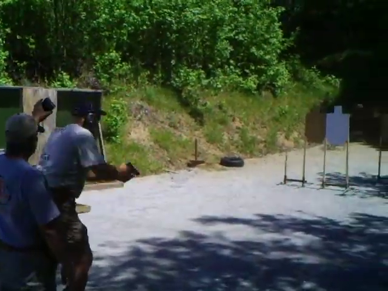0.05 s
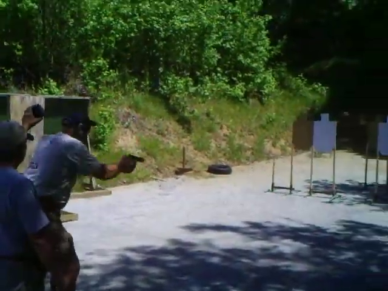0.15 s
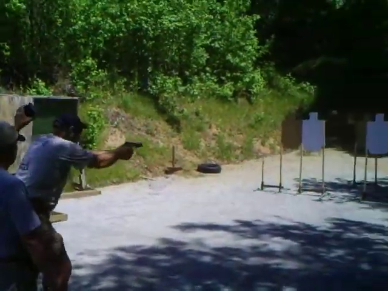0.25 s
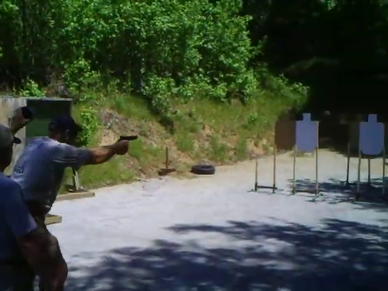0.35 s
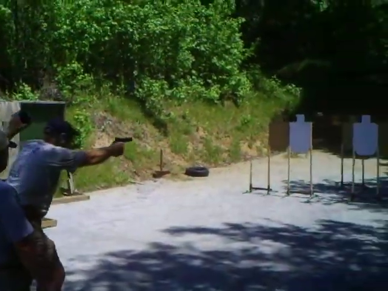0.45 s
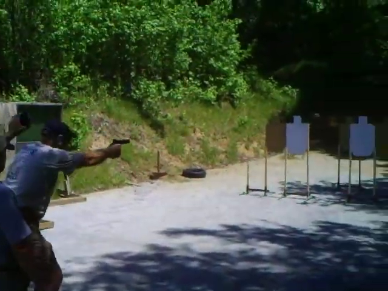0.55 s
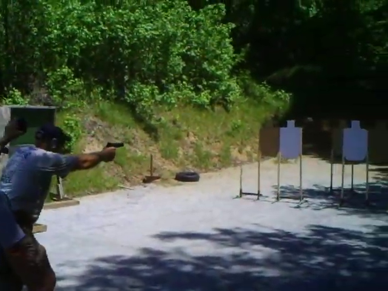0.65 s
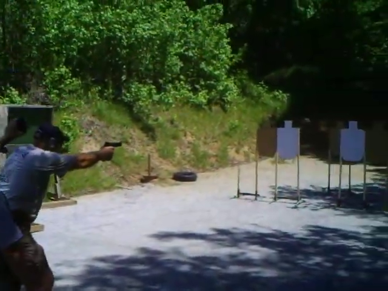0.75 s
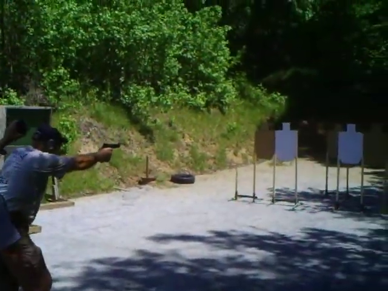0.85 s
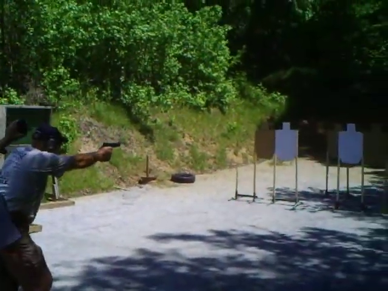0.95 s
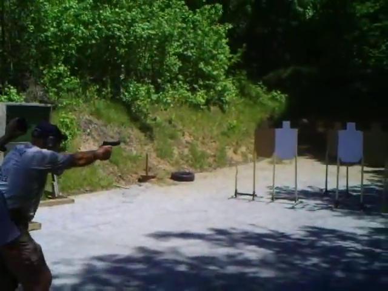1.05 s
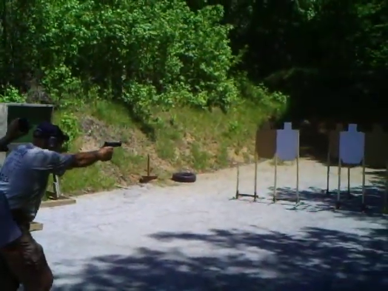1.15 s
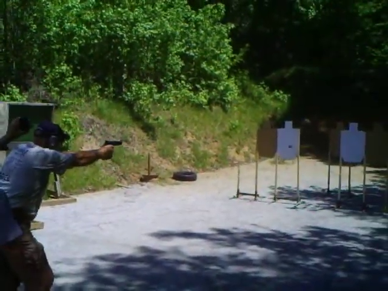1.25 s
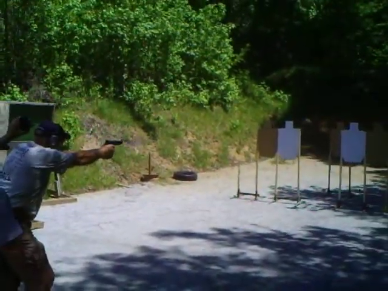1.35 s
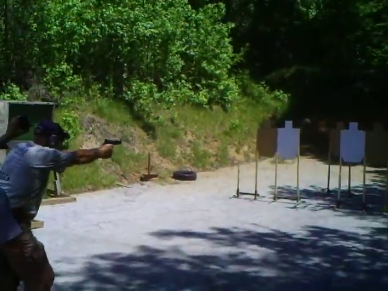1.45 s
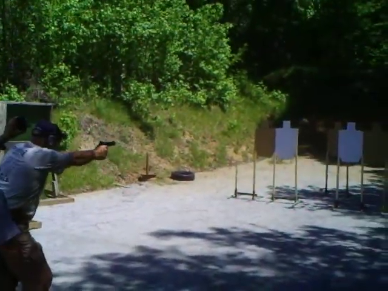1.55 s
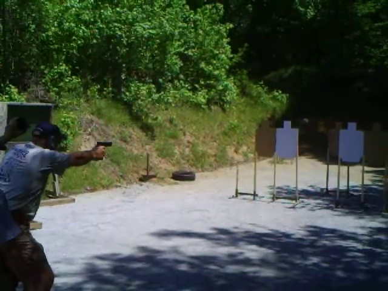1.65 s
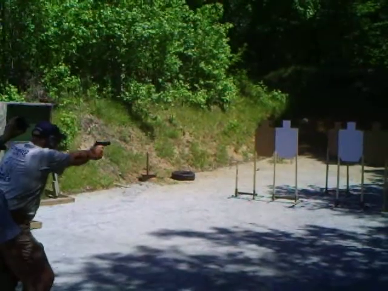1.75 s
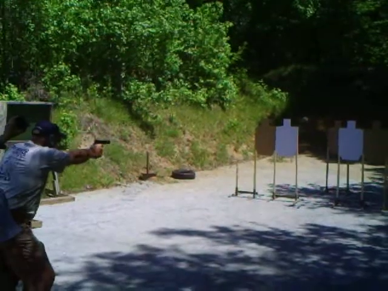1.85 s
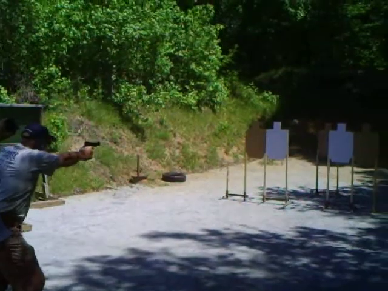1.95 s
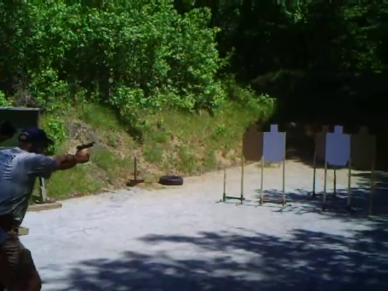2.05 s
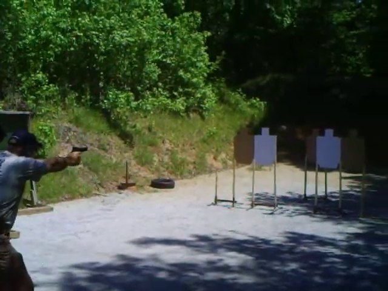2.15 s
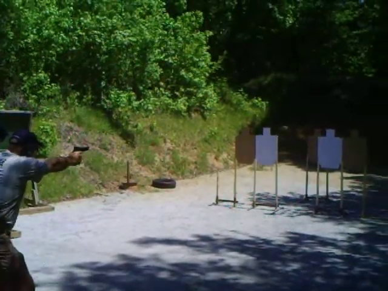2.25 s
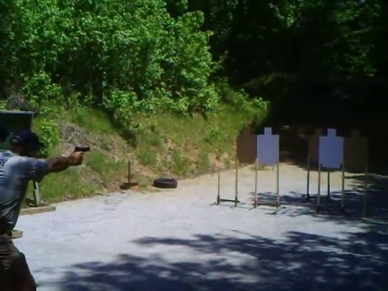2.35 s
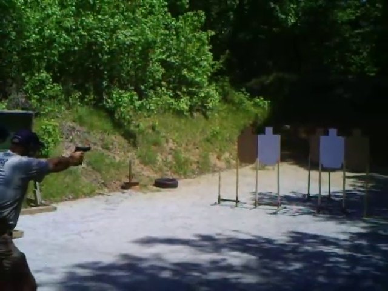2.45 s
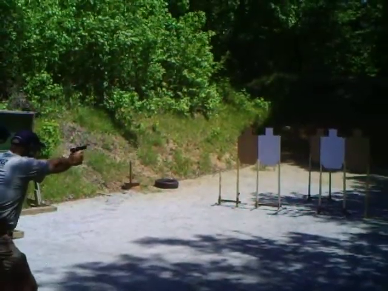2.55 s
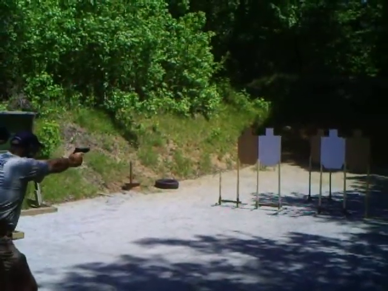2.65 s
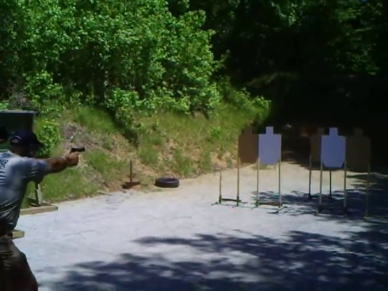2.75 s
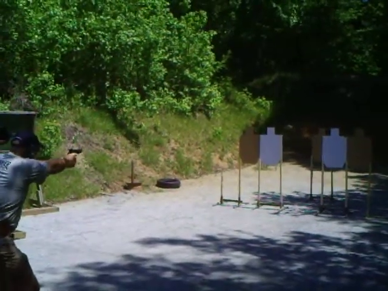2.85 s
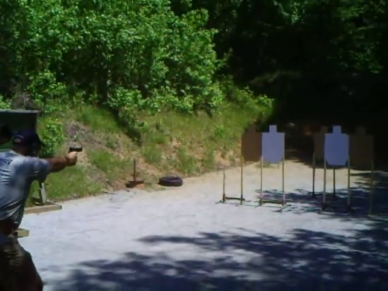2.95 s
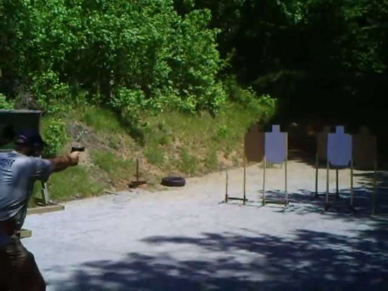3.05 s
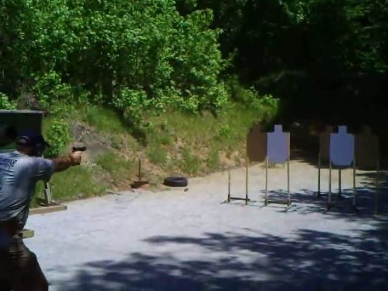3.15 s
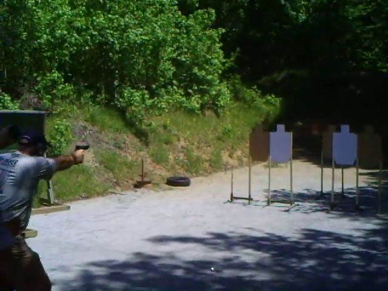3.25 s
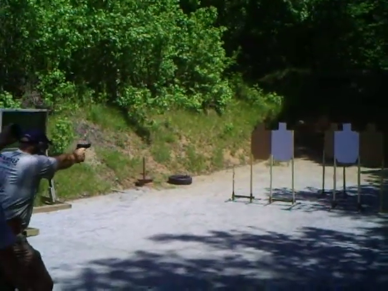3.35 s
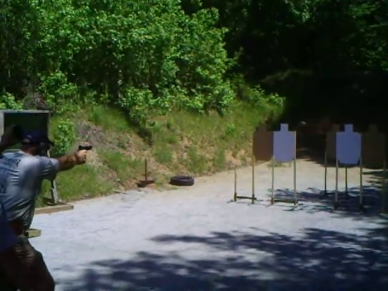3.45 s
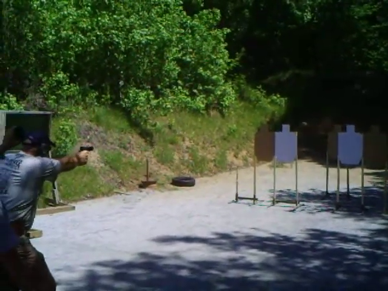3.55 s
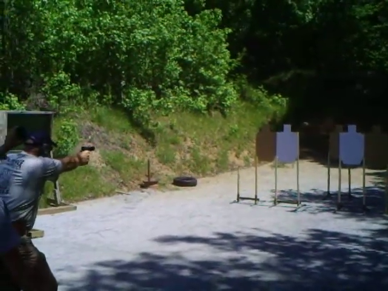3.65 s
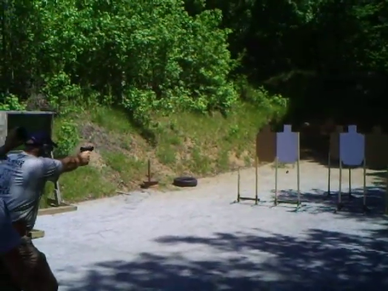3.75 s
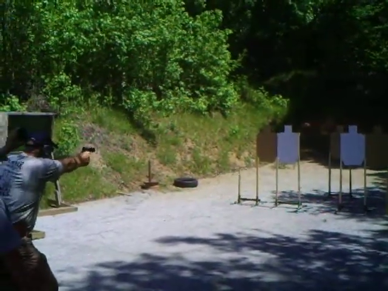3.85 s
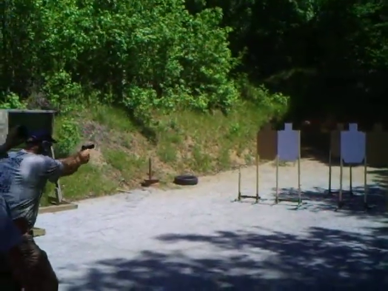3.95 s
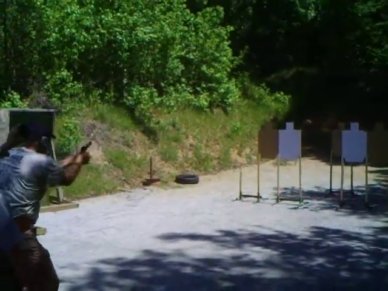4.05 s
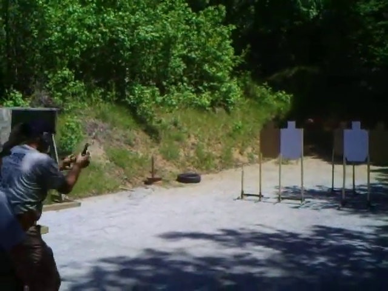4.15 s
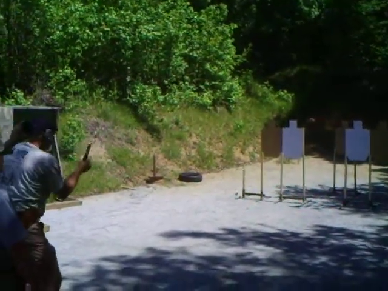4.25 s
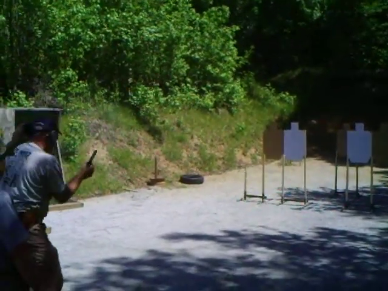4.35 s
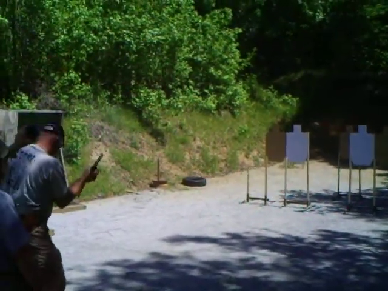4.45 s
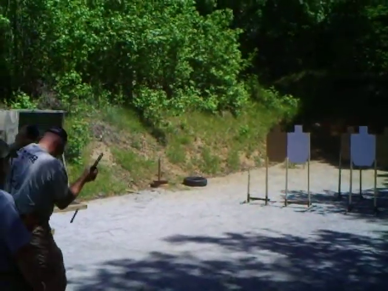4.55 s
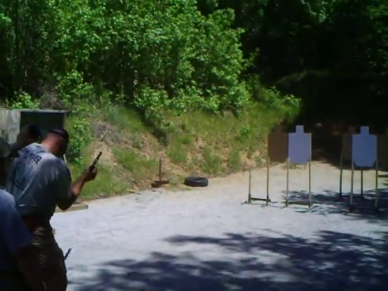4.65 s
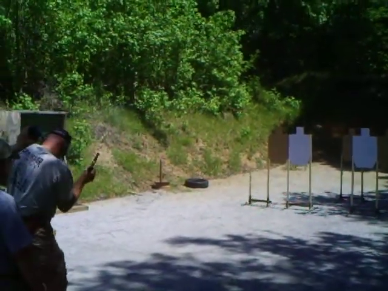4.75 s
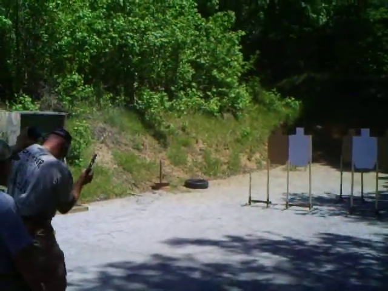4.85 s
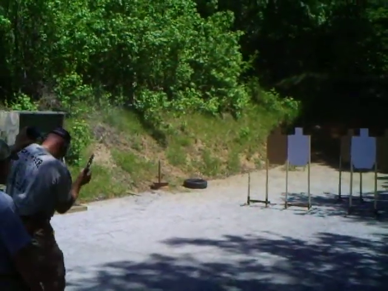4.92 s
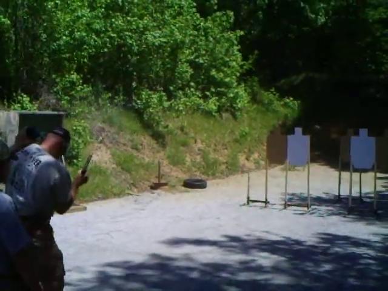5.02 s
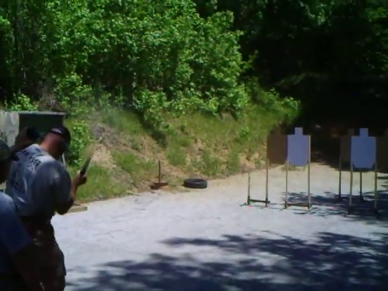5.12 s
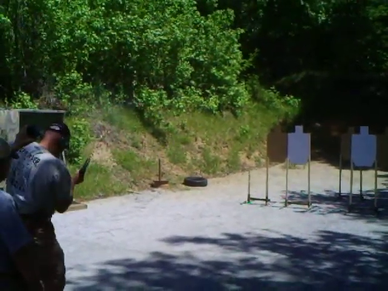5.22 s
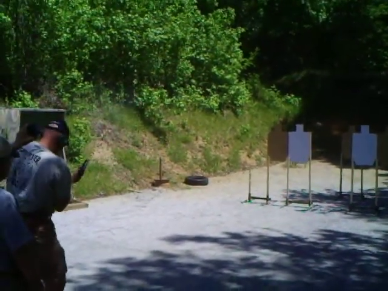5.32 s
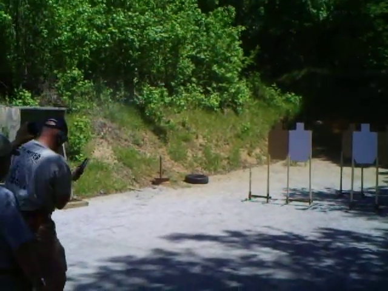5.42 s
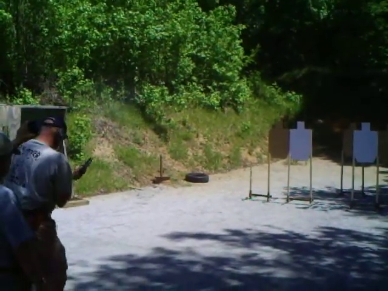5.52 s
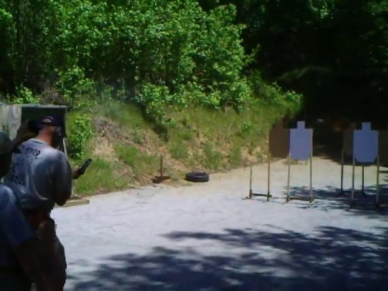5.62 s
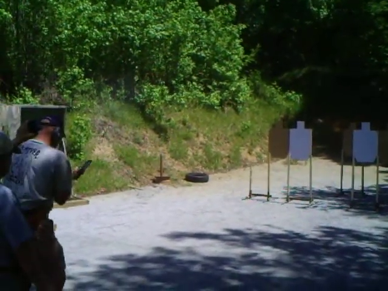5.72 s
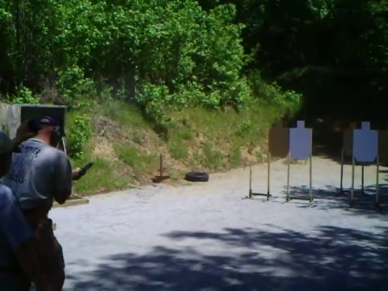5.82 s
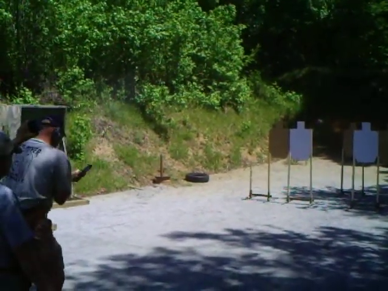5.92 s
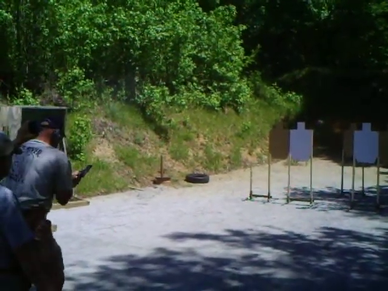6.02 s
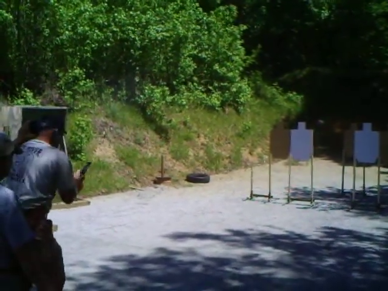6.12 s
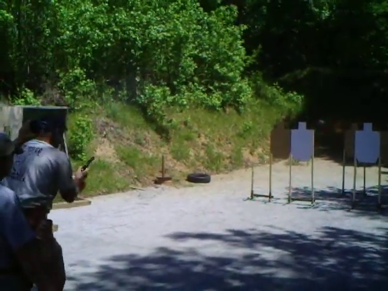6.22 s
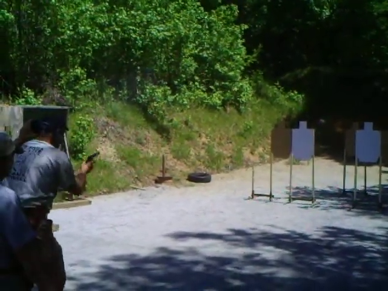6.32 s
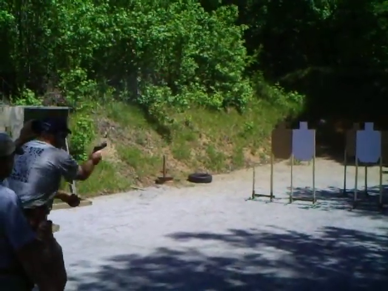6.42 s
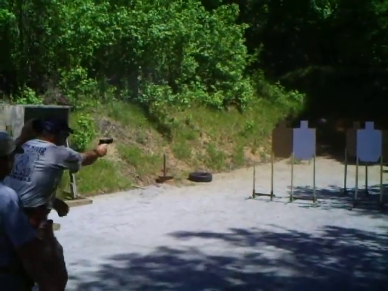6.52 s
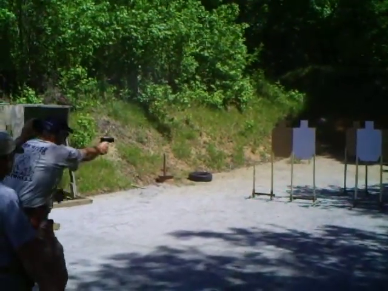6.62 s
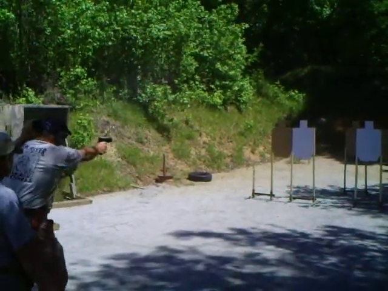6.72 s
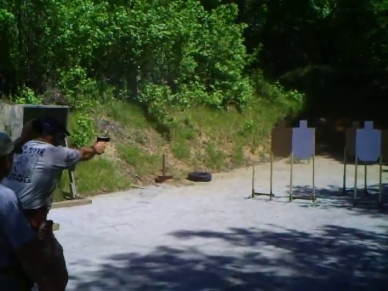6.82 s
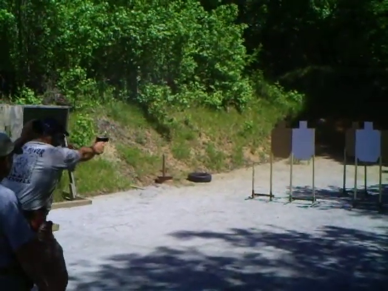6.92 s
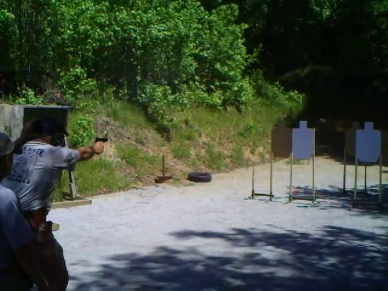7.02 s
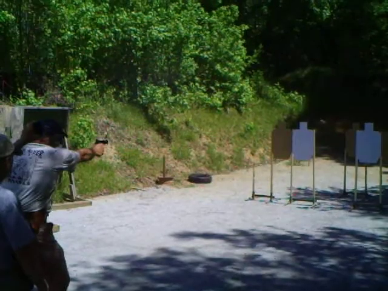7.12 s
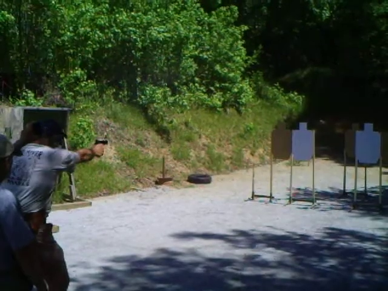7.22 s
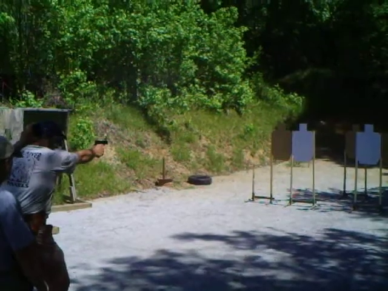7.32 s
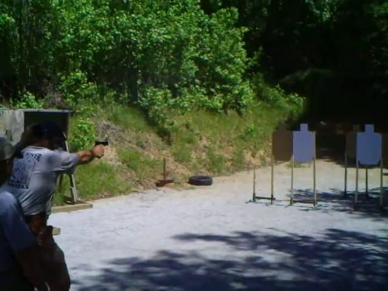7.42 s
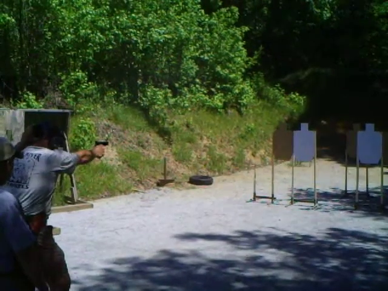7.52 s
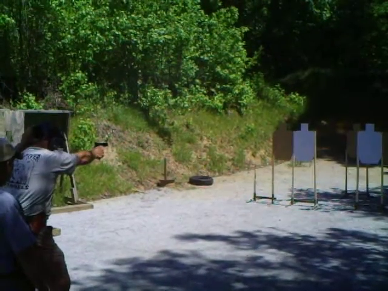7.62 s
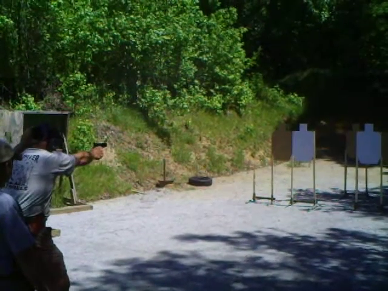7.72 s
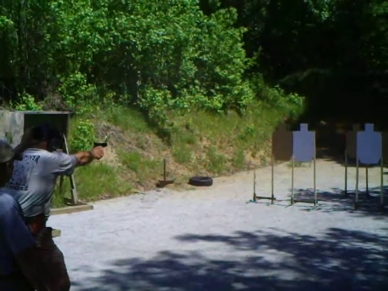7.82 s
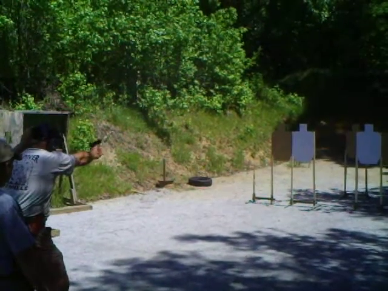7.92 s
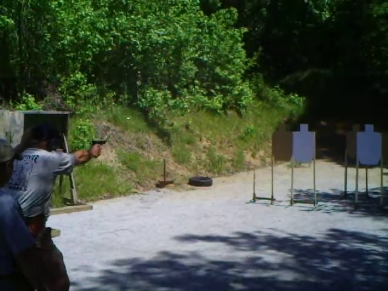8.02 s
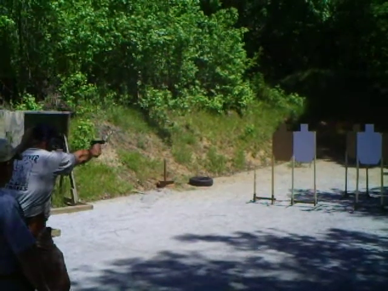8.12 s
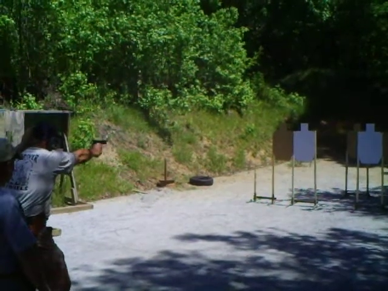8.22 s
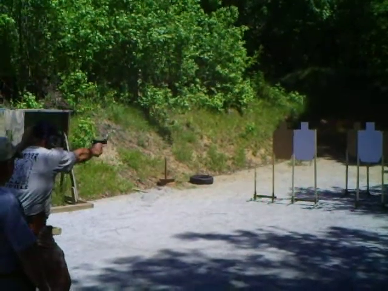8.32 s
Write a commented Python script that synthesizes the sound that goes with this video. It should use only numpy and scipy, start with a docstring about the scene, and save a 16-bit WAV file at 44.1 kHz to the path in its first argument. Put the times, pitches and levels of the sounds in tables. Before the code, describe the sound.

Over faint hiss and gravel scuffs, six overloaded pistol blasts slap and roll away; steel magazine clacks follow, then a last single blast.

```python
"""Shoes scuff gravel over a steady hiss, then a pistol fires three pairs of shots, is reloaded, and fires again.
The microphone belongs to a small camera with a narrow band: each blast overloads it, slaps back from a wall
and rolls through the trees. Blasts are pressure waves plus scattered echoes, shaped in time and spectrum.
Between shots come steel clacks (noise through resonances), dull knocks (damped modes), soft pops
and a faint electrical flutter (unevenly spaced dips)."""
import sys
import numpy as np
from scipy import signal
from scipy.fft import rfft, irfft
from scipy.io import wavfile

SR = 44100
rng = np.random.default_rng(int(sys.argv[2]) if len(sys.argv) > 2 else 0)


def store_wav(level_fs):
    """Save 16-bit WAV to argv[1]."""
    pcm = np.round(np.clip(np.atleast_2d(level_fs), -1, 1) * 32767)
    wavfile.write(sys.argv[1], SR, pcm.T.astype(np.int16))


N = 369558  # samples

# Colour tables give relative level per hertz; every coloured sound is then set to rms 1.
# Pass band of the microphone channel. Each row: frequency in Hz, gain in dB.
CHANNEL_BAND = [(10, -18), (40, -3), (3700, 3), (4000, -6), (4200, -11.5), (4400, -17.5), (4650, -41),
                (5200, -77), (6000, -100)]

# Steady hiss and faint rumble of the place. Each row: frequency in Hz, level per hertz in dB.
HISS_COLOUR = [(20, 14), (100, 3), (250, 4), (600, 1.5), (1300, -0.5), (2000, -2), (2800, -2.5),
               (4000, -2.5)]
RUMBLE_COLOUR = [(20, 0.5), (70, -2.5), (150, -17.5), (500, -50)]

# Soft low pops. Each row: time of the crest in seconds, level in dB.
POPS = [(3.412, -27.5), (3.545, -28.5)]

# Shoes scuffing gravel. Each row: start in seconds, length in seconds, level in dB.
SCUFFS = [(0.07, 0.038, -62.5), (0.105, 0.029, -61.5), (0.133, .007, -52), (.144, .16, -68),
          (0.158, .006, -50), (.172, .016, -52.5), (0.292, .03, -67.5), (0.557, .07, -66.5),
          (0.814, 0.052, -63.5)]
# Sound of the small stones. Each row: frequency in Hz, level per hertz in dB.
GRAVEL_COLOUR = [(100, -20), (400, -12), (1050, -3), (1800, -8.5), (4000, -6.5)]

# Dull knocks. Each row: start in seconds, level in dB.
KNOCKS = [(.136, -56), (.161, -57), (.178, -67), (.792, -62), (6.54, -66), (6.578, -62), (7.244, -67),
          (7.426, -47.5), (7.839, -66.5)]
# Modes of the hollow thing struck. Each row: frequency in Hz, level in dB, time to fall 60 dB in seconds.
KNOCK_MODES = [(920, -1.5, 0.056), (1114, -2, 0.11), (1280, -9, .07), (1560, -11, 0.066),
               (1710, -17, 0.037), (2770, -7, .05)]
# Rattle in a knock. Each row: frequency in Hz, level per hertz in dB.
KNOCK_COLOUR = [(100, -25), (500, -11), (900, 4), (1600, -0.5), (2200, -5.5), (3400, -12.5), (4400, -22)]

# Steel clacks of magazine and slide. Each row: start in seconds, level in dB,
# brightness in dB per octave, main ring in Hz, lift of that ring in dB.
CLACKS = [(.873, -48.5, 5, 3570, 3), (4.853, -31.5, 0, 2970, 19), (4.862, -25.5, 1, 2567, 19),
          (4.877, -36, 4, 2900, 9), (4.903, -39, 4, 2640, 15), (5.087, -26.5, 2, 2570, 0),
          (5.193, -40, 7, 3780, 3.5), (5.247, -42, -4, 2280, 4), (5.455, -40, 7, 3400, 6),
          (5.543, -43, 6, 3170, 8.5), (5.618, -44, 2, 3240, 19), (5.659, -46, 0, 3300, 15),
          (5.681, -43, 5, 3600, 10), (5.695, -31, 2.5, 3720, 6), (5.899, -55.5, -3, 2000, 12),
          (6.011, -35.5, 1.5, 3400, 6), (6.017, -39.5, -5.5, 2000, 0), (6.053, -45, 5, 3020, 7),
          (6.277, -50, 5.5, 3600, 2), (6.321, -53, 6.5, 3584, 5.5), (6.41, -57, 0.5, 3600, 6),
          (6.648, -53, 1.5, 3400, 5), (6.703, -58.5, 0, 3100, 9), (6.82, -49.5, -5, 3520, 16),
          (6.84, -50.5, 1.5, 3500, 5), (6.89, -46, 5, 3000, 2), (6.906, -49, 0, 2900, 11)]
# Modes of the steel. Each row: frequency in Hz, width in Hz, lift in dB.
STEEL_MODES = [(751, 200, 0.5), (1202, 250, 2), (2177, 250, 3), (2557, 190, 3.5), (2926, 140, -1),
               (3380, 130, -0.5)]
# Steel apart from its modes. Each row: frequency in Hz, level per hertz in dB.
STEEL_COLOUR = [(100, -37), (400, -18), (700, -8.5), (1500, -5.5), (3500, -0.5), (4400, -0.5)]
# A freely ringing part dies later: base decay in s, and s more per dB of ring lift.
CLACK_T60, T60_PER_LIFT = .023, .0011
# Rattle after a clack: length in s, level under the blow in dB, change over that length in dB.
RATTLE_S, RATTLE_DB, RATTLE_FADE_DB = 0.12, -18.5, -5.5

# Pistol shots. Each row: time in seconds, strength in dB, stance (rounded: shots from one stance wake
# nearly the same echoes), thump off the wall in dB, delay of the bank's face in seconds,
# echo of that face in dB, echo of the whole bank in dB.
SHOTS = [(.897, -.5, 0, -12, 0.087, -23, 0), (1.3943, -0.6, 0, -9.5, .092, -19, -0.37),
         (2.0893, -0.27, 1, 0, 0.076, -14, -0.35), (2.584, -0.6, 1, -2, 0.077, -17, -0.2),
         (3.2137, -0.75, 2.5, -10.5, 0.076, -24, -0.58), (3.7843, -1, 2, -11.5, 0.092, -20.5, -0.25),
         (7.9403, -0.5, 3, -10, 0.052, -25, -1)]
# Travel times of the two hard reflections, s.
ROOF_S, WALL_S = .0198, .0387

# Envelopes: level (dB), delay, attack and hold (s), sag while held (dB per s), 60 dB decay (s);
# a lingering share has its own level (dB) and decay (s).
# First crack of the muzzle, and its colour. Each row: frequency in Hz, level per hertz in dB.
CRACK = dict(db=-14, delay_s=-.0016, attack_s=.0014, hold_s=0.0042, t60=.007)
CRACK_COLOUR = [(100, -17.5), (800, -13.5), (1700, -6), (2600, 3), (4000, -5)]
# Bounce off the gravel, scatter from ground and shelter, and slap off the shelter's roof;
# the roof delay counts from ROOF_S.
GROUND = dict(db=-13, delay_s=0, attack_s=0.0034, hold_s=.002, t60=0.02)
NEAR = dict(db=-8.5, delay_s=0, attack_s=0.0023, hold_s=.05, sag_db_per_s=169, t60=.17)
ROOF = dict(db=-10, delay_s=-0.00091, attack_s=0.0014, hold_s=.001, t60=.014)
# Colour shared by these three. Each row: frequency in Hz, level per hertz in dB.
NEAR_COLOUR = [(20, -11.5), (110, -9.5), (230, -8), (345, -4.5), (430, -5), (600, 1), (790, 1),
               (1000, -1.5), (1250, -1), (1950, -5.5), (2700, -2.5), (3650, -7), (4400, -2)]
# Ringing of the shelter. Each row: frequency in Hz, width in Hz, lift in dB.
SHELTER_MODES = [(340.5, 21, 3.5), (593, 38, 3.5), (756.3, 53, 1.5), (1235, 70, 0), (1477, 150, 5),
                 (2610, 46, 7)]
# Hollow boom of the shelter, building up after the crack. Each row: frequency in Hz, level per hertz in dB.
BOOM = dict(db=-18.5, delay_s=0.0014, attack_s=0.011, hold_s=0.0067, t60=.068)
BOOM_COLOUR = [(60, -29.5), (240, -11), (335, 1.5), (390, -4.5), (480, -7.5), (700, -25.5), (1500, -49)]
# Slap from the wall, its delay counted from WALL_S. Each row: frequency in Hz, level per hertz in dB.
SLAP = dict(db=-5.5, delay_s=-0.0013, attack_s=0.0019, hold_s=0.0015, t60=.021)
SLAP_COLOUR = [(20, -9.5), (120, -10), (350, -10.5), (600, 11), (780, 9), (1000, -1), (1250, 2),
               (1700, -5.5), (2000, -11), (2900, -5), (4000, -5)]
# First echo from the bank's face, its delay counted from the shot's own face delay.
FACE = dict(delay_s=-0.0068, attack_s=.004, hold_s=0.0054, t60=0.02)
# Echoes from the bank and the edge of the wood. Each row: frequency in Hz, level per hertz in dB.
BANK = dict(db=-13, delay_s=.058, attack_s=0.0044, hold_s=.12, sag_db_per_s=30.5, t60=0.3)
BANK_COLOUR = [(20, -22), (110, -25), (200, -10), (300, -10.5), (480, -1.5), (740, 5), (900, 1.5),
               (1400, 1.5), (1900, -2), (2600, 3), (3200, -0.5), (3700, 2.5), (4400, 1)]
# Roll from deep in the wood. Each row: frequency in Hz, level per hertz in dB, extra loss in dB per second.
WOOD = dict(db=-24.5, delay_s=0.096, attack_s=0.12, hold_s=0.16, sag_db_per_s=14, t60=1.1, linger_db=-9, linger_t60=4.2)
WOOD_COLOUR = [(20, -34, -2), (185, -27, 0), (310, -8, 0.5), (466, -5, -2.5), (610, 3.5, 1.5), (1030, 2, 2),
               (1340, 0.5, 2), (1830, -3, 4.5), (2420, 2.5, 10.5), (3080, -1.5, 11), (3700, 1.5, 16),
               (4400, -2, 11.5)]


def amp(db):
    """Turns dB into an amplitude factor."""
    return 10 ** (np.asarray(db) / 20)


def evened(x):
    """Scales to rms 1."""
    return x / np.sqrt(np.mean(x ** 2) + 1e-20)


def read(points, hz):
    """Joins (Hz, value) points on a log-frequency axis."""
    f, value = np.transpose(points)
    return np.interp(np.log(hz + 1), np.log(f + 1), value)


def add(mix, s, sound):
    """Mixes a sound in at time s."""
    part = mix[max(round(s * SR), 0):][:len(sound)]
    part += sound[:len(part)]


def decay(t, t60):
    """Falls by 60 dB in t60 seconds."""
    return np.exp(-np.log(1000) * t / t60)


def envelope(t, delay_s, attack_s, hold_s, t60, db=0, sag_db_per_s=0, linger_db=-150, linger_t60=1):
    """An echo arrives, rises, sags while its surface keeps answering, then dies; a share may linger."""
    age = t - delay_s
    rise = np.clip(age / attack_s, 0, 1)
    held = np.clip(age - attack_s, 0, abs(hold_s))
    released = np.maximum(age - attack_s - hold_s, 0)
    fade = decay(released, t60) + amp(linger_db) * decay(released, linger_t60)
    return amp(db - sag_db_per_s * held) * rise * fade / (1 + amp(linger_db))


def coloured(x, colour, modes=(), tilt_db=0):
    """Gives x a spectrum, resonances and a slope, as heard through the microphone channel; rms 1."""
    hz = np.fft.rfftfreq(len(x), 1 / SR)
    slope = tilt_db * np.log2(np.maximum(hz, 100) / 2000)
    db = read(colour, hz) + read(CHANNEL_BAND, hz) + slope
    for centre, width, lift in modes:
        db = db + lift / (1 + (2 * (hz - centre) / width) ** 2)
    return evened(irfft(rfft(x) * amp(db), len(x)))


def flutter():
    """Electrical dips at uneven gaps, about 26 a second, with their slow drift filtered out."""
    period, width, start, stop = .038, .0095, .48, 7.6  # s
    gaps = period * rng.uniform(.76, 1.24, 260)
    dips = np.zeros(N)
    for s in start + np.cumsum(gaps) - period:
        if s < stop:
            add(dips, s, -signal.windows.tukey(round(width * SR), .5))
    return signal.sosfilt(signal.butter(1, 5, "high", fs=SR, output="sos"), dips)


def background(hiss_db=-71.5, flutter_db=-64, rumble_db=-83):
    """Even hiss and a faint rumble, both steady coloured noise, under the electrical flutter."""
    dips = flutter()
    rumble = coloured(rng.standard_normal(N), RUMBLE_COLOUR)
    hiss = coloured(rng.standard_normal(N), HISS_COLOUR)
    return amp(hiss_db) * hiss + amp(flutter_db) * dips + amp(rumble_db) * rumble


def pops(width_s=0.00068):
    """Single soft bumps of pressure, bell-shaped in time."""
    t = np.arange(N) / SR
    return sum(amp(db) * np.exp(-((t - s) / width_s) ** 2) for s, db in POPS)


def scuffs(grains_per_s=2500):
    """Small stones tick against each other under a shoe: sparse random impulses, coloured."""
    out = np.zeros(N)
    for s, length, db in SCUFFS:
        struck = rng.random(16384) < grains_per_s / SR
        grains = rng.standard_normal(16384) * struck
        stroke = signal.windows.tukey(int(np.clip(length * SR, 16, len(grains))), .5)
        add(out, s, amp(db) * coloured(grains, GRAVEL_COLOUR)[:len(stroke)] * stroke)
    return out


def knocks(rattle_db=-1, rattle_t60=0.1, attack_s=0.00061):
    """Light blows on something hollow: a few damped modes in a short rattle."""
    t, out = np.arange(8192) / SR, np.zeros(N)
    for s, db in KNOCKS:
        ring = np.zeros(len(t))
        for hz, level, t60 in KNOCK_MODES:
            ring += amp(level) * decay(t, t60) * np.sin(2 * np.pi * (hz * t + rng.random()))
        noise = coloured(rng.standard_normal(len(t)), KNOCK_COLOUR)
        rattle = amp(rattle_db) * noise * decay(t, rattle_t60)
        add(out, s, amp(db) * (ring + rattle) * (1 - np.exp(-t / attack_s)))
    return out


def clack(db, bright_db, hz, lift_db, ring_db=-23, ring_t60=0.27, ring_width_hz=420, attack_s=.00085):
    """Steel meets steel: a short burst in the gun's modes and a weak lingering ring."""
    t = np.arange(8192) / SR
    modes = [*STEEL_MODES, (hz, ring_width_hz, lift_db)]
    steel = coloured(rng.standard_normal(len(t)), STEEL_COLOUR, modes, bright_db)
    fade = decay(t, CLACK_T60 + T60_PER_LIFT * lift_db) + amp(ring_db) * decay(t, ring_t60)
    return amp(db) * steel * fade * (1 - np.exp(-t / attack_s))


def clacks():
    """Magazine and slide strike; after each blow loose parts rattle faintly on in three small blows."""
    out = np.zeros(N)
    for s, db, *colour in CLACKS:
        add(out, s, clack(db, *colour))
        for late in rng.uniform(size=3):
            add(out, s + late * RATTLE_S, clack(db + RATTLE_DB + RATTLE_FADE_DB * late, *colour))
    return out


def scatter(count):
    """Countless small reflections: one of random sign and place in every four samples."""
    size = 4
    taps = np.zeros((count // size, size))
    places = rng.integers(0, size, len(taps))
    taps[np.arange(len(taps)), places] = rng.choice([-2., 2.], len(taps))
    return taps.ravel()


def absorbed(x):
    """Air and leaves take the treble away as the echo travels."""
    hz, t, z = signal.stft(x, SR, nperseg=512)
    loss = read([(f, rate) for f, _, rate in WOOD_COLOUR], hz)
    return signal.istft(z * amp(-loss[:, None] * t), SR, nperseg=512)[1][:len(x)]


def blast_wave(t, length):
    """A jump of pressure followed by a longer suction."""
    u = np.maximum(t, 0) / length
    return (t > 0) * (1 - u) * np.exp(-u)


def pressure_push(t, wall_push_db, push_db=-7, roof_push_db=-15, push_s=0.0013):
    """The pressure wave arrives three times: straight, off the roof and off the wall."""
    channel = signal.butter(4, 3700, fs=SR, output="sos")
    arrivals = (.001, push_db), (ROOF_S, roof_push_db), (WALL_S, wall_push_db)
    push = sum(amp(level) * blast_wave(t - delay, push_s) for delay, level in arrivals)
    return -signal.sosfilt(channel, push)


def close_echoes(t, paths, face_s, face_db, bank_db):
    """The crack, then scattered returns from the gravel, shelter, wall and bank."""
    crack, near, boom, slap, bank = paths[-5 * len(t):].reshape(-1, len(t))
    close = envelope(t, **CRACK) * coloured(crack, CRACK_COLOUR)
    # ground scatter and roof slap add in power
    nearby = envelope(t, **GROUND) + np.hypot(envelope(t, **NEAR), envelope(t - ROOF_S, **ROOF))
    close += nearby * coloured(near, NEAR_COLOUR, SHELTER_MODES)
    close += envelope(t, **BOOM) * coloured(boom, BOOM_COLOUR)
    close += envelope(t - WALL_S, **SLAP) * coloured(slap, SLAP_COLOUR)
    bank_rise = envelope(t - face_s, db=face_db, **FACE) + amp(bank_db) * envelope(t, **BANK)
    return close + bank_rise * coloured(bank, BANK_COLOUR)


def wood_roll(t, paths):
    """Late echoes from deep among the trees swell slowly, lose treble and linger."""
    colour = [row[:2] for row in WOOD_COLOUR]
    return envelope(t, **WOOD) * absorbed(coloured(paths, colour))


def shots():
    """Each blast returns from the ground, the shelter, the wall, the bank and the wood."""
    long, short, lead = 131072, 20480, .003  # samples, samples, s ahead of the shot
    place_share, stance_share, own_share = .22, .62, .16  # of the echo power
    t = np.arange(long) / SR - lead
    early = t[:short]
    terrain, stances = scatter(long), [scatter(long) for _ in SHOTS]
    out = np.zeros(N)
    for s, db, stance, wall_push_db, face_s, face_db, bank_db in SHOTS:
        # the echo pattern belongs to the place and shifts when the shooter turns
        paths = np.sqrt(place_share) * terrain
        paths += np.sqrt(stance_share) * stances[round(stance)]
        paths += np.sqrt(own_share) * scatter(long)
        close = close_echoes(early, paths, face_s, face_db, bank_db)
        add(out, s - lead, amp(db) * (close + pressure_push(early, wall_push_db)))
        add(out, s - lead, amp(db) * wood_roll(t, paths))
    return out


def scene():
    """Everything that reaches the one microphone, from the background to the pistol."""
    return (background() + pops() + scuffs() + knocks() + clacks() + shots())[None]


def record(dry, knee=9, headroom=1.053):
    """The loudest crests flatten against the input's ceiling; then the band limit."""
    ceiling = .715  # of full scale
    channel = signal.firwin(255, 4450, window=("kaiser", 8), fs=SR)[None]
    squeezed = dry / (1 + abs(dry / (ceiling * headroom)) ** knee) ** (1 / knee)
    # the narrow channel rounds the flattened crests, and those that overshoot clip again
    clipped = np.clip(signal.oaconvolve(squeezed, channel, "same"), -ceiling, ceiling)
    edge = signal.firwin(255, 16000, window=("kaiser", 9), fs=SR)[None]
    return signal.oaconvolve(clipped, edge, "same")


dry = scene()
out = record(dry)
store_wav(out)
```